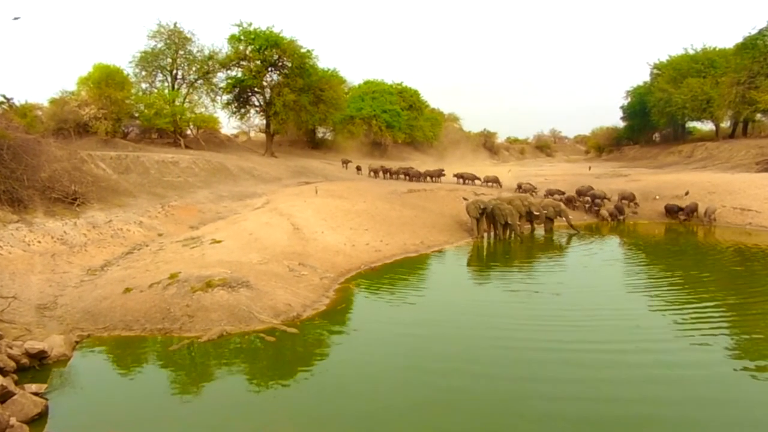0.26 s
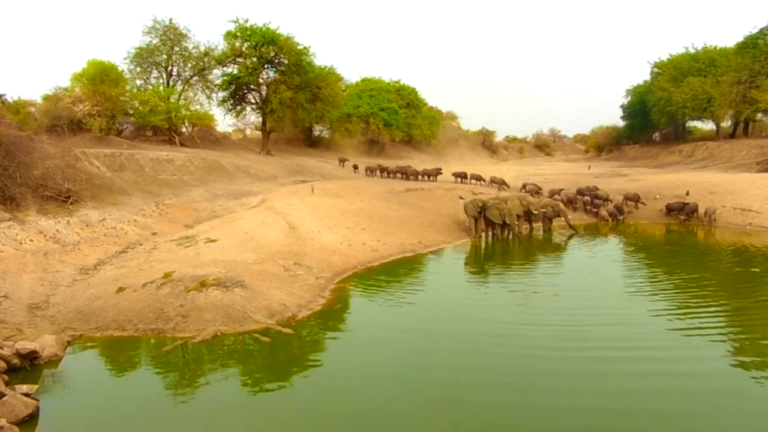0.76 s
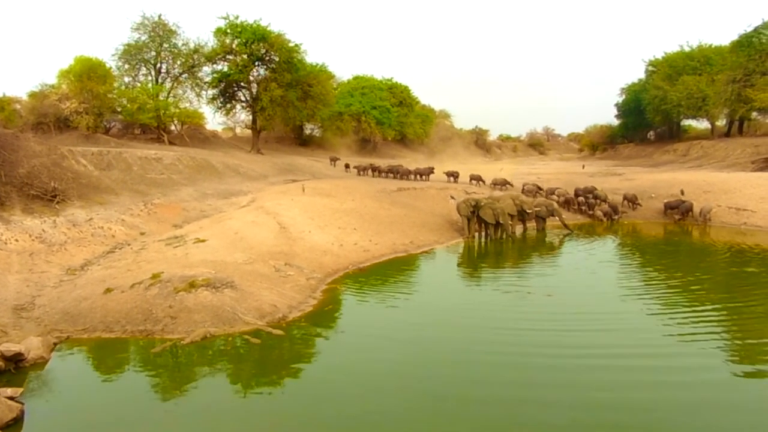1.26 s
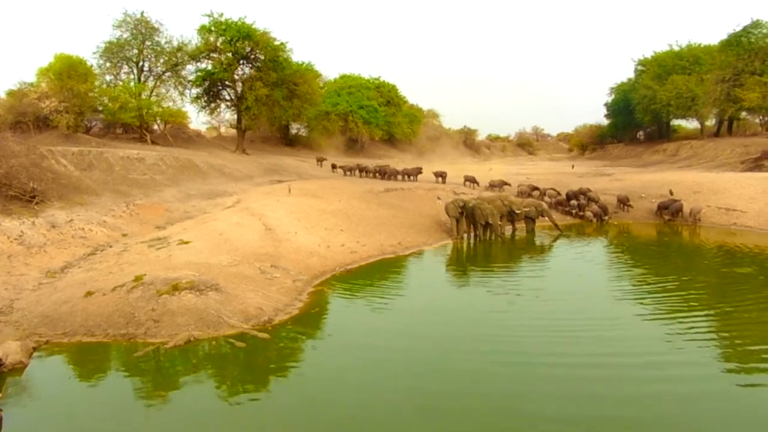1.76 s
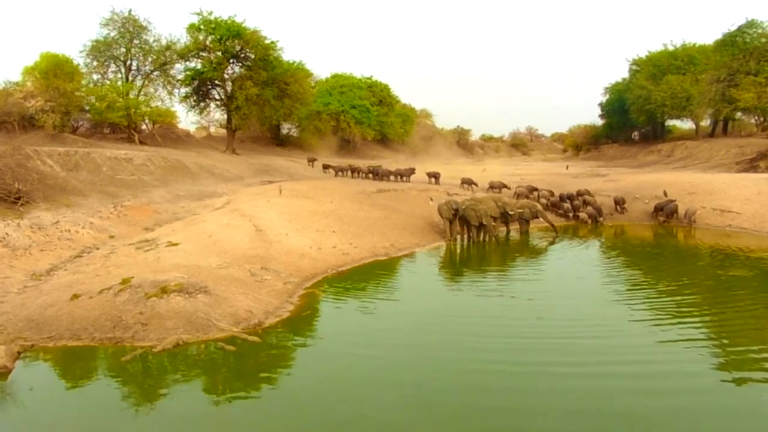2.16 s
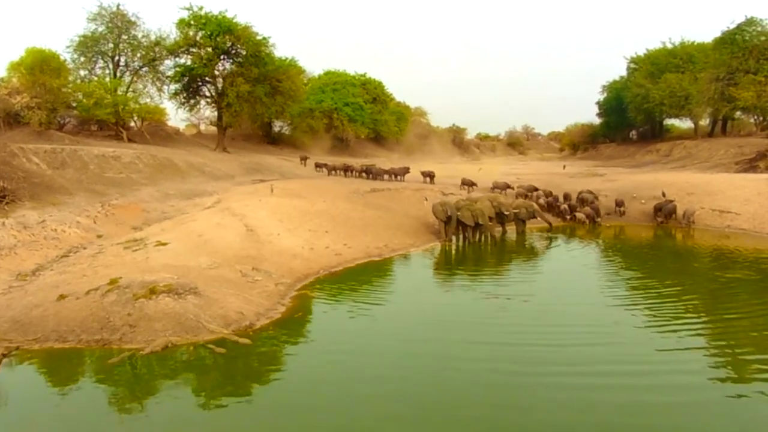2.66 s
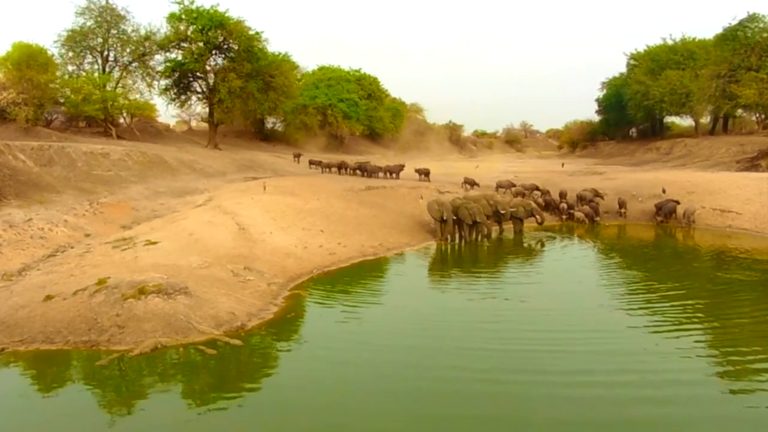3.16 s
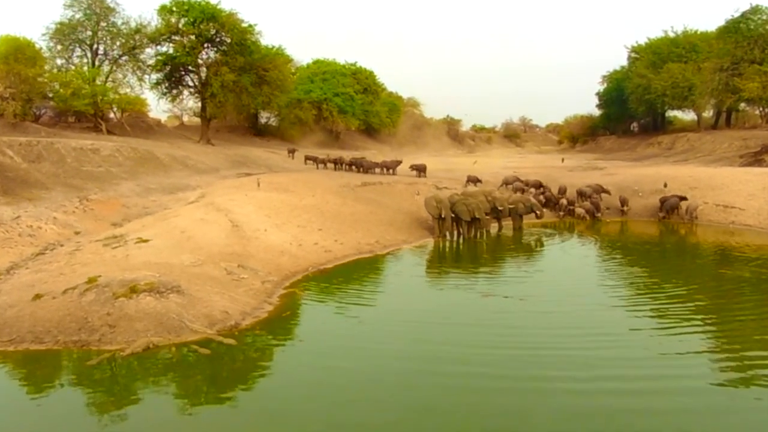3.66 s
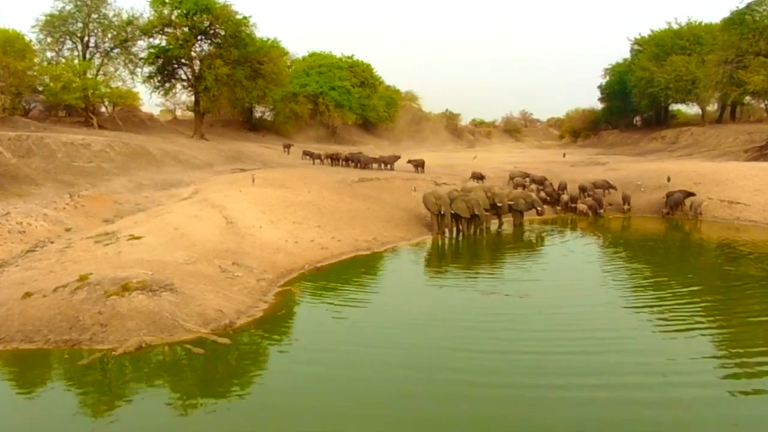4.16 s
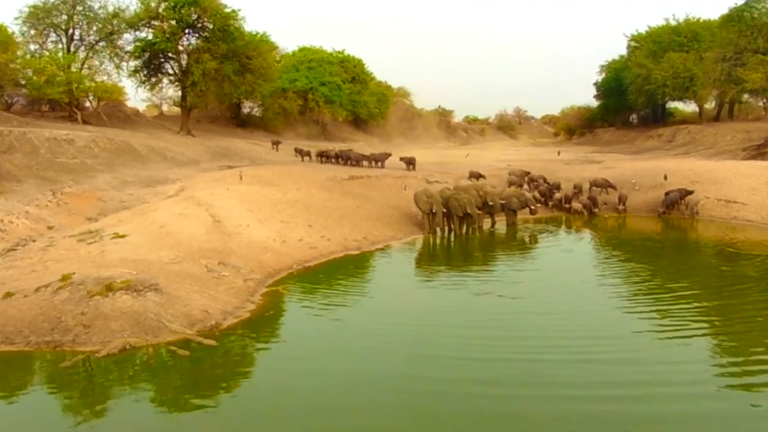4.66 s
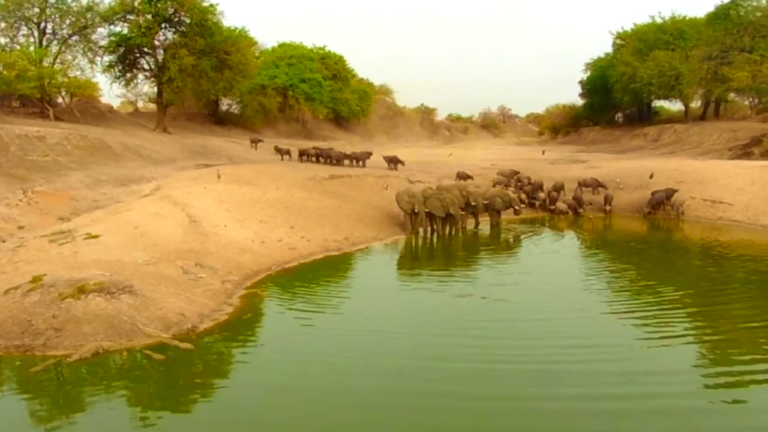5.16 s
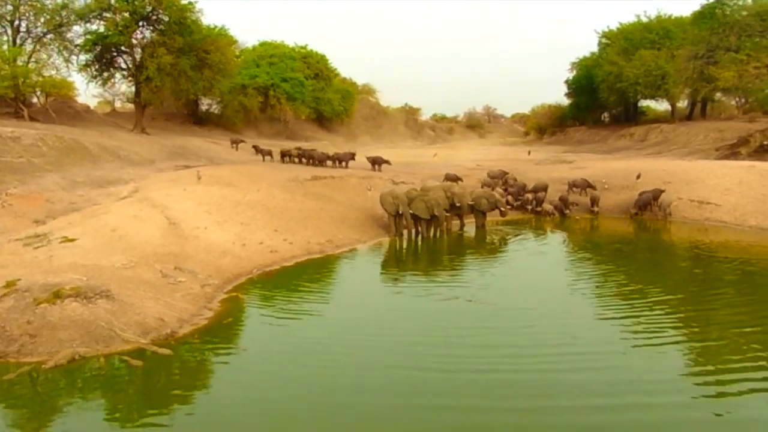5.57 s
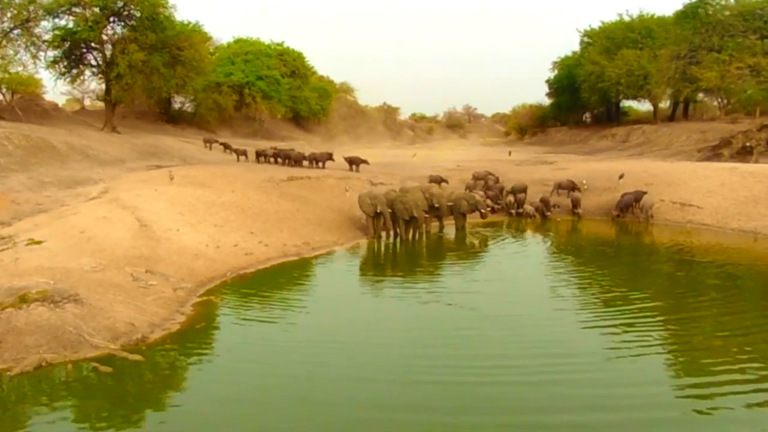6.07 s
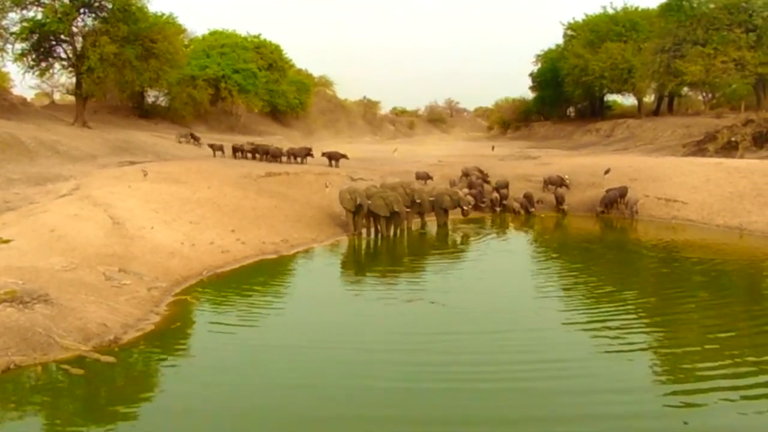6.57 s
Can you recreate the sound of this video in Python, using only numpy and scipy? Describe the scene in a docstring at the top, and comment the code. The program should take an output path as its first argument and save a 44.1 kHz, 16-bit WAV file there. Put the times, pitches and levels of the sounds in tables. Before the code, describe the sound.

Throughout, a far flock of small birds makes a dense, gently swelling chatter of very short mid-high chirps and hoarse squawks, with nearer raspy chirps falling quickly in pitch. A bright, even microphone hiss and a faint, flickering wash of distant herd and water sit below. From 0 to 1.8 s thin double pips repeat several times a second, with one more near 3 s. Small soft splashes come at 0.8 and 2 s; a falling whistle at 1.5 s is answered by a rising one at 3.4 s. Harsh screeches and deeper squawks are scattered about. Dull handling bumps occur near 2, 3.1 and 6.2 s, with low rumbles. From 4.4 to 5.9 s soft far hoots run evenly, while rounder yelps repeat about every 0.4 s from 4.6 s onward. Dry clicks cluster at 5.25 s; hollow knocks fall at 5.55, 5.8 and 6.4 s, then a brief splash at 6.5 s. Light outdoor echo.

```python
"""A waterhole in dry bush: small birds chatter throughout in short falling chirps, over a herd's wash and a steady hiss.
The first three seconds carry double pips, two splashes and a whistle; a second whistle follows at about 3.4 s.
Soft camera bumps come near 2, 3.1 and 6.2 s. From about 4.4 s come far hoots and a bird's repeated yelps,
then camera clicks, hollow knocks and a last splash. Squawks and screeches are dotted throughout. Calls are gliding
tones; water, herd, screeches and hiss are filtered noise; knocks and clicks ring; noise tails echo banks and trees."""
import sys
import numpy as np
from scipy import signal
from scipy.fft import rfft, irfft
from scipy.io import wavfile

SR = 44100
rng = np.random.default_rng(int(sys.argv[2]) if len(sys.argv) > 2 else 0)


def int16_out(signal):
    """Quantize to a 16-bit WAV file."""
    q = np.round(np.clip(np.atleast_2d(signal).T, -1, 1) * 32767)
    wavfile.write(sys.argv[1], SR, q.astype(np.int16))


N = 300762  # length in samples, about 6.8 s


def undb(db):
    """Turn decibels into a gain."""
    return 10 ** (np.asarray(db) / 20)


def unit(x):
    """Scale a sound to an average (rms) level of 1."""
    return x / np.sqrt(np.mean(x ** 2))


def curve(rows):
    """Join (time_s, value) rows by straight lines."""
    return np.interp(np.arange(N) / SR, *np.transpose(rows))


def colour(x, points):
    """Filter a sound by (frequency_hz, gain_db) points, joined along a logarithmic frequency scale."""
    hz, db = np.transpose(points)
    bins_hz = np.maximum(np.fft.rfftfreq(len(x), 1 / SR), 1)
    gain = undb(np.interp(np.log(bins_hz), np.log(hz), db))
    return irfft(rfft(x) * gain, len(x))


def coloured_noise(points):
    """Steady random noise of one colour, at an average level of 1."""
    return unit(colour(rng.standard_normal(N), points))


def walk(rate_hz, size=N):
    """Wander at random, with straight lines between `rate_hz` new values a second."""
    steps = np.arange(size) / SR * rate_hz
    own_rng = np.random.default_rng(rng.integers(2 ** 31))
    knots = own_rng.standard_normal(int(steps[-1]) + 2)
    return np.interp(steps, np.arange(len(knots)), knots)


def add(track, start_s, sound):
    """Mix a sound into the track, dropping whatever lies outside it."""
    start = int(start_s * SR)
    lo, hi = max(start, 0), min(start + len(sound), N)
    if hi > lo:
        track[lo:hi] += sound[lo - start:hi - start]


def swells(rows):
    """Loudness outline of smooth swells from (middle_s, length_s, level_db) rows."""
    envelope = np.zeros(N)
    for middle_s, length_s, db in rows:
        add(envelope, middle_s - length_s / 2, undb(db) * np.hanning(int(length_s * SR)))
    return envelope


def bursts(rows, points):
    """Noise that starts suddenly and dies away, from (start_s, level_db, decay_s) rows."""
    envelope, t = np.zeros(N), np.arange(SR // 4) / SR
    for start_s, db, decay_s in rows:
        add(envelope, start_s, undb(db) * np.exp(-t / decay_s))
    return envelope * coloured_noise(points)


def note(start_hz, end_hz, length_s, partial_db, waver=0, rough_db=0, arch=0):
    """A gliding, arched tone that swells and fades; a hoarse throat shakes its pitch and level."""
    u = np.linspace(0, 1, max(int(length_s * SR), 2))  # progress through the note
    arc = np.sin(np.pi * u)
    glide_hz = start_hz * (end_hz / start_hz) ** u
    hz = glide_hz * (1 + arch * arc + waver * walk(328.4, len(u)))
    phase = 2 * np.pi * np.cumsum(hz) / SR
    swell = arc * undb(rough_db * walk(231, len(u)))
    # partial k vibrates k times as fast as the first
    partials = [undb(db) * np.sin(k * phase) for k, db in enumerate(partial_db, 1)]
    return swell * sum(partials)


def scatter(x, t60_s, wet_db):
    """Add a diffuse echo: random reflections that fall by 60 dB in t60_s."""
    t = np.arange(SR // 2) / SR
    tail = rng.standard_normal(len(t)) * np.exp(-np.log(1000) * t / t60_s)
    echo = signal.fftconvolve(x, tail / np.linalg.norm(tail))[:N]
    return x + undb(wet_db) * echo


def whine(pitch_hz=6606, level_db=-63):
    """A very faint, steady electronic whine: a pure tone and its octave."""
    phase = 2 * np.pi * pitch_hz * np.arange(N) / SR
    return undb(level_db) * (np.sin(phase) + np.sin(2 * phase))


# Colour of the microphone hiss: frequency_hz, density_db (per Hz)
HISS_COLOUR = [(1500, -85), (4500, -30.5), (6500, 9.5), (9500, 15), (13000, 11.5), (15500, 8.5)]


def hiss(level_db=-41, side_db=-25):
    """Bright, even microphone hiss: one noise in both channels, and a little that is opposite in the two."""
    mid, side = coloured_noise(HISS_COLOUR), coloured_noise(HISS_COLOUR)
    both = mid + undb(side_db) * side * np.array([[1], [-1]])
    low_cut = signal.butter(2, 900, "high", fs=SR, output="sos")
    return undb(level_db) * signal.sosfilt(low_cut, both)


# Colour of the herd and the open bush: frequency_hz, density_db (per Hz)
HERD_COLOUR = [(25, -15), (70, -15), (185, -7.5), (420, -5), (620, -0.5), (2500, -8), (10000, -8.5)]
# Splashes at the water's edge: start_s, level_db, decay_s
SPLASHES = [(.835, -42.5, 0.17), (2.017, -41.5, 0.19), (6.535, -34, 0.058)]


def herd(level_db=-38):
    """Far hooves and stirred water blur into a flickering noise wash, with a few clearer splashes."""
    flicker = undb(1.5 * walk(40))
    wash = unit(colour(rng.standard_normal(N) * flicker, HERD_COLOUR))
    splashes = bursts(SPLASHES, [(150, -14), (620, 25), (8000, -35)])
    return undb(level_db) * wash + splashes


# Rings of the camera casing: pitch_hz, level_db
CASING = [(900, -30), (1450, -21), (2050, -19.5), (2700, -20.5), (7350, -31)]
# Dry clicks on the camera: start_s, casing_gain_db, snap_gain_db
CLICKS = [(5.2446, 1, -1), (5.2563, -1, -5), (5.2579, -4, -2), (5.2715, -7, -18), (5.2744, -1, -8)]
# Colour of the bright snap of contact: frequency_hz, gain_db
SNAP_COLOUR = [(1500, -20), (7400, -4), (15000, -13)]


def camera_clicks(decay_s=.0011):
    """Each click makes the casing ring and adds a bright snap: a filtered pulse with a very short noisy tail."""
    rings, snaps = np.zeros((2, N))
    t = np.arange(SR // 50) / SR
    ring = sum(undb(db) * np.sin(2 * np.pi * hz * t) * np.exp(-t / decay_s) for hz, db in CASING)
    low_cut = signal.butter(2, 600, "high", fs=SR, output="sos")
    ring = signal.sosfilt(low_cut, ring)
    for start_s, casing_db, snap_db in CLICKS:
        add(rings, start_s, undb(casing_db) * ring)
        add(snaps, start_s, undb([snap_db]))  # a pulse of one sample
    bright_snaps = colour(scatter(snaps, t60_s=.01, wet_db=0), SNAP_COLOUR)
    return scatter(rings, t60_s=.03, wet_db=-10) + bright_snaps


# Soft bumps on the camera body: middle_s, pitch_hz, length_s, level_db
BUMPS = [(1.974, 53.7, 0.06, -48), (3.127, 72, 0.032, -38), (6.175, 179.6, 0.049, -39),
         (6.191, 102, 0.017, -29.5)]
# Rumbles as the grip shifts on the camera: middle_s, length_s, level_db
RUMBLES = [(2.23, 0.4, -50.5), (2.8, 0.15, -43), (6.29, 0.32, -48)]
# Colour of the rumbles: frequency_hz, density_db (per Hz)
RUMBLE_COLOUR = [(45, 0), (130, -4.5), (600, -67)]


def camera_grip():
    """Dull bumps are short, wavering low tones; the shifting grip makes swells of low noise."""
    bumps = np.zeros(N)
    for middle_s, hz, length_s, db in BUMPS:
        bump = note(hz, hz, length_s, [db, db - 6], waver=.25, rough_db=2)
        add(bumps, middle_s - length_s / 2, bump)
    return bumps + swells(RUMBLES) * coloured_noise(RUMBLE_COLOUR)


# Short hollow knocks: start_s, pitch_hz, level_db
KNOCKS = [(5.555, 726, -36), (5.8138, 724, -27), (6.429, 720, -27.5)]


def knocks(decay_s=.0036, tick_hz=1710, tick_db=-1):
    """Hollow knocks: a low ring of a few cycles with a higher tick that dies twice as fast."""
    out, t = np.zeros(N), np.arange(SR // 20) / SR
    tick = undb(tick_db) * np.sin(2 * np.pi * tick_hz * t) * np.exp(-2 * t / decay_s)
    for start_s, hz, db in KNOCKS:
        ring = np.sin(2 * np.pi * hz * t) * np.exp(-t / decay_s)
        add(out, start_s, undb(db) * (ring + tick))
    return scatter(out, t60_s=.06, wet_db=-8)


# A far bird's run of hoots: first_s, period_s, pitch_hz (each hoot varies around it)
HOOTS = (4.405, .173, 670)


def hoots(level_db=-45):
    """Nine soft, arched tones at an even pace, blurred by a strong echo."""
    out = np.zeros(N)
    first_s, period_s, hz = HOOTS
    for i, pitch in enumerate(hz * np.exp(.03 * rng.standard_normal(9))):
        hoot = note(pitch, pitch, .1, [level_db], waver=.04, rough_db=3, arch=.2)
        add(out, first_s + i * period_s, hoot)
    return scatter(out, t60_s=.3, wet_db=-4)


# Double pips of a thin-voiced bird: middle_s
PIPS = [.009, 0.168, .346, .547, .758, .99, 1.222, 1.505, 1.774, 2.962]
# Slurred whistles: middle_s, start_hz, end_hz, length_s, arch (share of the pitch), level_db
WHISTLES = [(1.555, 3200, 2680, .115, .07, -41.5), (3.435, 3380, 4150, .165, .13, -44)]


def pips_and_whistles(pip_db=-39):
    """Pairs of steep falling pips and thin, slurred whistles, each a single gliding tone."""
    out = np.zeros(N)
    for middle_s in PIPS:
        add(out, middle_s - .006, note(4200, 3600, .011, [pip_db], rough_db=3))
        add(out, middle_s + .005, note(4550, 3550, .014, [pip_db], rough_db=3))
    for middle_s, start_hz, end_hz, length_s, arch, db in WHISTLES:
        whistle = note(start_hz, end_hz, length_s, [db], waver=.006, rough_db=3.5, arch=arch)
        add(out, middle_s - length_s / 2, whistle)
    return scatter(out, t60_s=.2, wet_db=-8)


# Harsh screeches: middle_s, length_s, level_db
SCREECHES = [(0.842, .09, -43), (1.028, 0.37, -44.5), (2.84, .08, -48), (3.867, .05, -45),
             (4.275, 0.084, -44), (6.267, 0.094, -41)]
# Colour of the screeches: frequency_hz, density_db (per Hz)
SCREECH_COLOUR = [(1200, -27), (2300, -14), (3600, 11.5), (9000, -31)]


def screeches():
    """Harsh, pitchless scolding: breathy noise chopped by a fast, uneven flutter."""
    flutter = undb(3 * walk(220))
    breath = unit(colour(rng.standard_normal(N) * flutter, SCREECH_COLOUR))
    return swells(SCREECHES) * breath


# Partials of a squawk, from the lowest up: level_db
SQUAWK_PARTIALS_DB = [-22, -2, -3.5, 0, 2, 1, -1]


def squawk(hz, length_s, bend=.93):
    """A hoarse call with many partials that ends at `bend` times its starting pitch."""
    return note(hz, hz * bend, length_s, SQUAWK_PARTIALS_DB, waver=.07, rough_db=4)


# Slowly rising and falling murmur of the far flock: time_s, level_db
MURMUR = [(0, -35), (1.06, -39), (2.7, -38), (3.1, -38), (3.89, -40.5), (4.29, -36), (4.8, -40.5),
          (5.36, -37.5)]


def flock_level(join_db=-9.5, join_s=.15):
    """The far flock's murmur slowly rises and falls, and swells around each near chirp and yelp."""
    # doubling the decibels turns a level into a power
    joining = [(middle_s, join_s, 2 * (db + join_db)) for middle_s, *_, db in CHIRPS + YELPS]
    return np.sqrt(undb(curve(MURMUR)) ** 2 + swells(joining))


# Colour of the flock across the water: frequency_hz, gain_db
FLOCK_COLOUR = [(400, -19.5), (750, -4.5), (1050, -1), (1280, -3.5), (1520, -7), (1800, 1.5), (2600, -5.5),
                (3100, -6.5)]


def far_flock(count=480, chirp_hz=1280, squawk_hz=471.4, squawk_db=-9, rasp_db=-6):
    """Hundreds of short calls overlap, every fourth a squawk; the farthest blur into a noisy rasp."""
    out = np.zeros(N)
    starts_s = (np.arange(count) + rng.random(count)) / count * N / SR
    birds = rng.standard_normal((count, 4))
    for i, (start_s, (pitch, size, loud, beak)) in enumerate(zip(starts_s, birds)):
        length_s = .021 * np.exp(.3 * size - .1)
        if i % 4:
            hz = chirp_hz * np.exp(.07 * pitch)
            # a wider beak favours the octave over the fundamental
            partial_db = [-1.6 * beak, 1.6 * beak]
            call = note(hz * 1.1, hz / 1.1, length_s, partial_db, waver=.02, rough_db=2)
        else:
            call = undb(squawk_db) * squawk(squawk_hz * np.exp(.12 * pitch), 3 * length_s)
        add(out, start_s, undb(2.2 * loud) * call)
    chatter = unit(scatter(out, t60_s=.2, wet_db=-6))
    rasp = coloured_noise(FLOCK_COLOUR)
    flock = unit(colour(chatter, FLOCK_COLOUR) + undb(rasp_db) * rasp)
    return flock * flock_level()


# Squawks that stand out of the flock: middle_s, bend (end pitch over start pitch),
# level_db (before the echo and the flock's colour)
SQUAWKS = [(0.849, .93, -34), (1.479, 1.16, -37.5), (2.253, 0.79, -40), (2.4, .93, -40),
           (5.35, 1.06, -38.5), (6.675, 1.04, -38)]


def loud_squawks(pitch_hz=395, length_s=.074):
    """A few deeper squawks, sagging or rising, carry across the water above the rest."""
    out = np.zeros(N)
    for (middle_s, bend, db), pitch in zip(SQUAWKS, rng.standard_normal(len(SQUAWKS))):
        call = unit(squawk(pitch_hz * np.exp(.05 * pitch), length_s, bend))
        add(out, middle_s - length_s / 2, undb(db) * call)
    return colour(scatter(out, t60_s=.15, wet_db=-3), FLOCK_COLOUR)


def chirp(hz, length_s, octaves, low_db, octave_db, waver=.028, rough_db=3.3):
    """A fundamental and its octave fall together, passing `hz` halfway down."""
    half = 2 ** (octaves / 2)
    return note(hz * half, hz / half, length_s, [low_db, octave_db], waver=waver, rough_db=rough_db)


# Nearer chirps: middle_s, pitch_hz, length_s, fall_octaves, level_db (before beak, throat and echo)
CHIRPS = [(0.258, 1414, 0.059, 0.3, -34), (0.261, 1100, 0.094, 0.48, -32), (0.324, 1233, 0.046, 0.27, -33),
          (0.333, 1338, 0.046, 0.4, -34.5), (0.361, 1240, 0.034, 0.2, -36), (0.509, 1283, 0.051, 0.05, -36),
          (0.533, 1280, 0.056, 0.4, -30.5), (0.616, 1304, 0.025, 0.27, -34.5),
          (0.694, 1272, 0.02, 0.21, -33), (0.747, 1243, 0.021, 0.05, -31.5), (0.799, 1277, 0.03, 0.23, -35),
          (0.813, 1260, 0.043, 0.2, -30.0), (0.844, 1040, 0.074, 0.52, -32.5),
          (0.87, 1249, 0.028, 0.042, -29.5), (0.929, 1235, 0.022, 0.093, -26.5),
          (0.983, 1194, 0.064, 0.5, -34.0), (1.068, 1236, 0.041, 0.4, -29.5),
          (1.096, 1260, 0.025, 0.14, -34), (1.178, 1220, 0.032, 0.4, -30.5), (1.28, 1265, 0.033, 0.14, -31),
          (1.667, 1274, 0.033, 0.36, -33.5), (1.745, 1175, 0.062, 0.55, -32),
          (1.872, 1266, 0.022, 0.37, -29.5), (2.101, 1257, 0.041, 0.65, -32.5),
          (2.193, 1353, 0.03, 0.1, -33), (2.224, 1170, 0.039, 0.064, -32),
          (2.381, 1345, 0.025, 0.33, -28.5), (2.487, 1257, 0.043, 0.05, -35),
          (2.612, 1252, 0.019, 0.27, -33), (2.814, 1238, 0.019, 0.44, -29), (2.833, 1200, 0.016, 0.24, -28),
          (3.02, 1248, 0.049, 0.41, -36), (3.108, 1230, 0.037, 0.41, -32.5),
          (3.24, 1238, 0.017, 0.31, -33.5), (3.256, 1177, 0.012, 0.088, -31),
          (3.299, 1334, 0.048, 0.18, -30), (3.422, 1295, 0.029, 0.33, -30.5),
          (3.475, 1230, 0.031, 0.21, -32.5), (3.506, 1146, 0.047, 0.444, -33.5),
          (3.682, 1330, 0.019, 0.1, -31.5), (3.874, 1463, 0.068, 0.37, -33),
          (3.9, 1257, 0.071, 0.057, -38.5), (4.02, 1323, 0.029, 0.4, -38), (4.137, 1272, 0.02, 0.43, -30),
          (4.29, 1046, 0.037, 0.24, -38), (4.387, 1310, 0.026, 0.3, -34), (4.462, 1290, 0.019, 0.28, -37),
          (4.66, 1220, 0.031, 0.4, -36), (4.961, 1310, 0.021, 0.29, -32.5),
          (5.192, 1300, 0.038, 0.23, -28.5), (5.43, 1390, 0.049, 0.11, -38), (5.478, 1285, 0.03, 0.42, -37),
          (5.693, 1323, 0.065, 0.44, -33.5), (5.878, 1366, 0.046, 0.45, -36.5),
          (5.997, 1411, 0.021, 0.05, -38.5), (6.022, 1205, 0.047, 0.45, -31.0),
          (6.05, 1260, 0.026, 0.34, -36)]
# Yelps of one rounder-voiced bird: middle_s, pitch_hz, level_db (before throat and echo)
YELPS = [(4.562, 1338, -32), (5.025, 1292, -31.5), (5.378, 1366, -30), (5.721, 1350, -29.5),
         (6.106, 1371, -27.5), (6.481, 1342, -31.5)]
# Fixed resonances of throat and beak: frequency_hz, gain_db
THROAT = [(950, -14), (1130, -5), (1290, 0), (1400, -1), (1550, -8), (1950, 0), (2550, -1.2), (3100, -3)]


def near_birds(yelp_s=.072, yelp_fall_octaves=.32):
    """Raspy falling chirps and smoother yelps glide through the fixed resonances of throat and beak."""
    out = np.zeros(N)
    beaks = rng.uniform(-1.56, 1, len(CHIRPS))  # each call tips the balance of fundamental and octave
    for (middle_s, hz, length_s, fall, db), beak in zip(CHIRPS, beaks):
        call = chirp(hz, length_s, fall, low_db=db - 3 + 2 * beak, octave_db=db - beak)
        add(out, middle_s - length_s / 2, call)
    for middle_s, hz, db in YELPS:
        call = chirp(hz, yelp_s, yelp_fall_octaves, db, db - 5.5, waver=.014, rough_db=2)
        add(out, middle_s - yelp_s / 2, call)
    # early echoes overlap the glide and break it into beads
    return scatter(colour(out, THROAT), t60_s=.13, wet_db=-9)


def scene():
    """Mix all sources; only the hiss differs between the two channels."""
    camera = whine() + hiss() + camera_clicks() + camera_grip()
    other_birds = hoots() + pips_and_whistles() + screeches() + loud_squawks()
    return camera + herd() + knocks() + other_birds + far_flock() + near_birds()


def record(dry):
    """The recorder cuts steeply above 15800 Hz."""
    top_cut = signal.ellip(12, .1, 70, 15800, fs=SR, output="sos")
    return signal.sosfilt(top_cut, dry)


dry = scene()
out = record(dry)
int16_out(out)
```